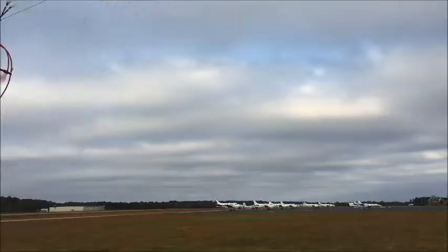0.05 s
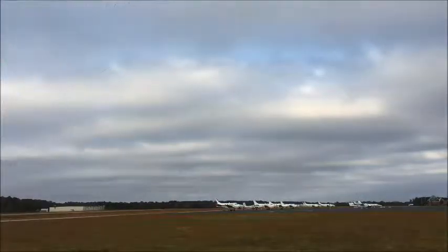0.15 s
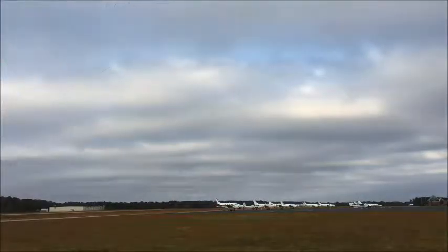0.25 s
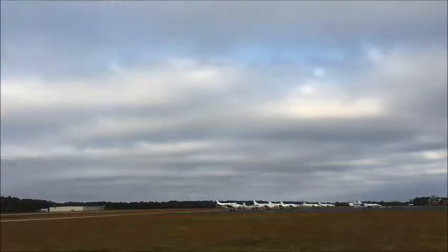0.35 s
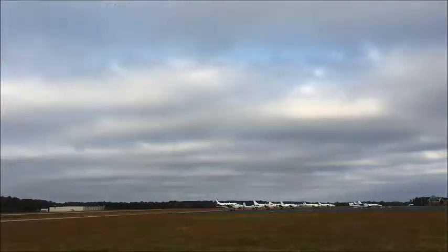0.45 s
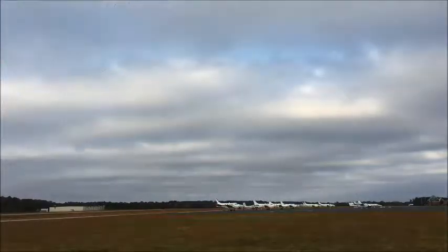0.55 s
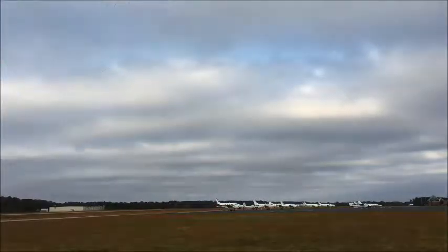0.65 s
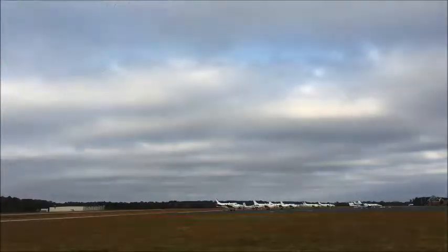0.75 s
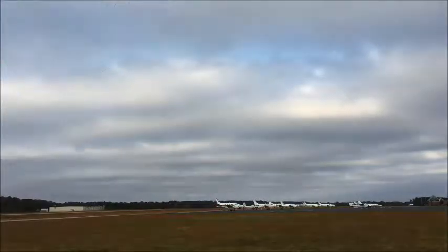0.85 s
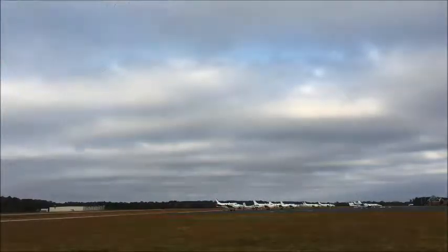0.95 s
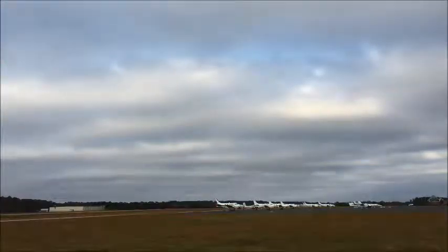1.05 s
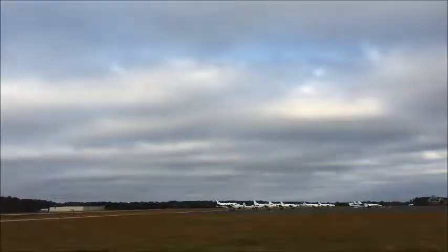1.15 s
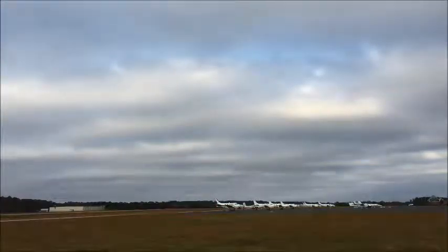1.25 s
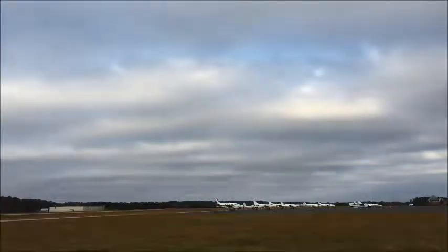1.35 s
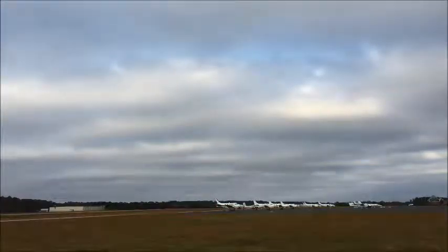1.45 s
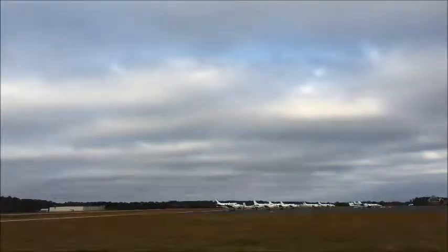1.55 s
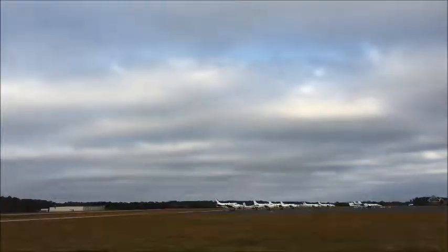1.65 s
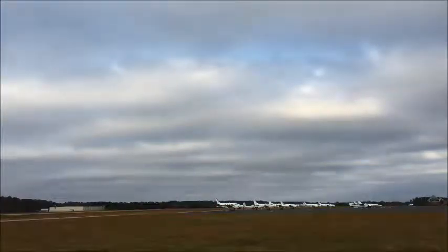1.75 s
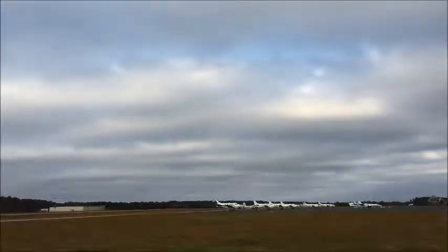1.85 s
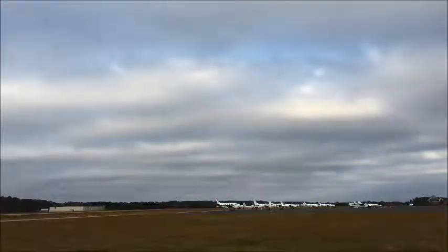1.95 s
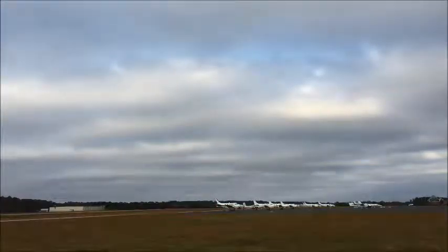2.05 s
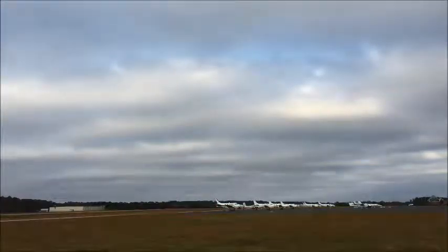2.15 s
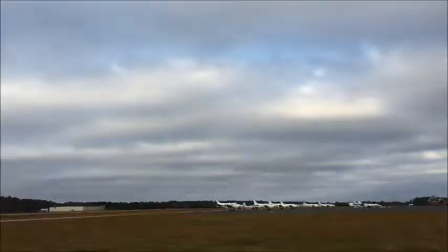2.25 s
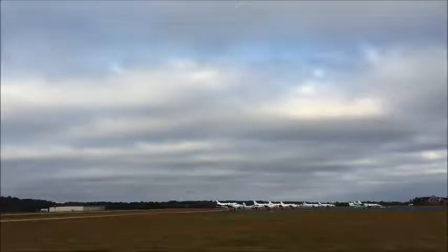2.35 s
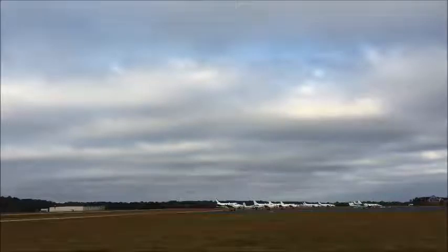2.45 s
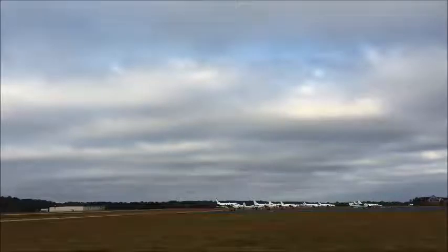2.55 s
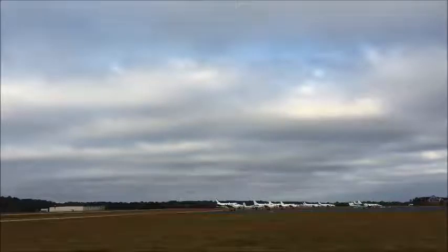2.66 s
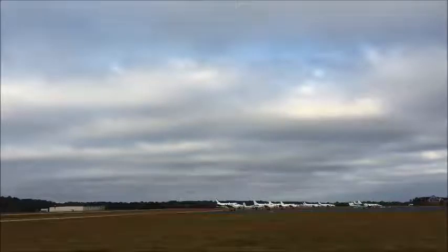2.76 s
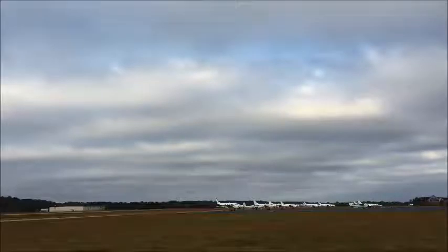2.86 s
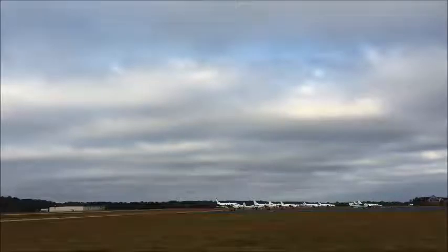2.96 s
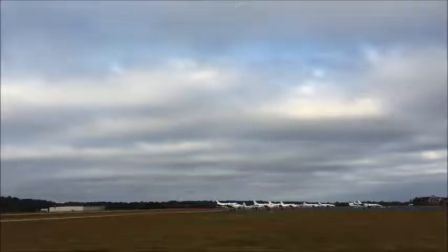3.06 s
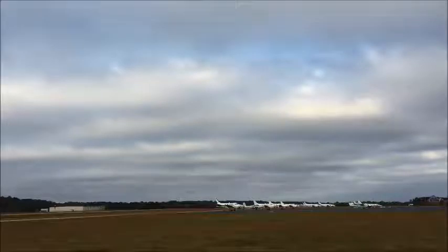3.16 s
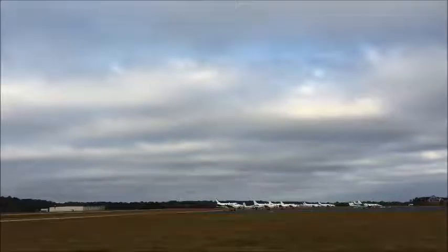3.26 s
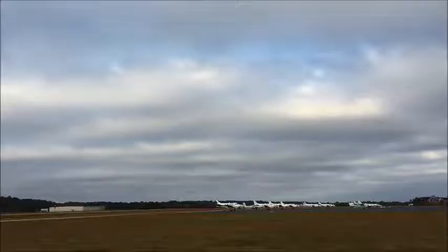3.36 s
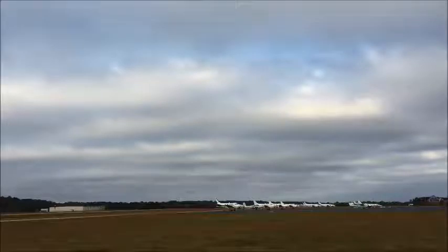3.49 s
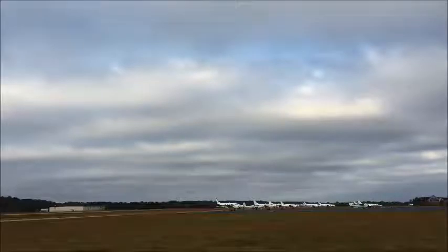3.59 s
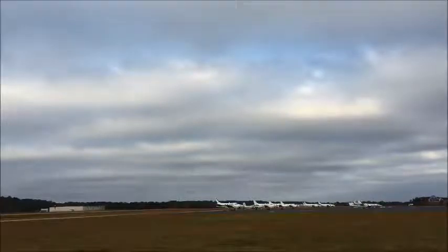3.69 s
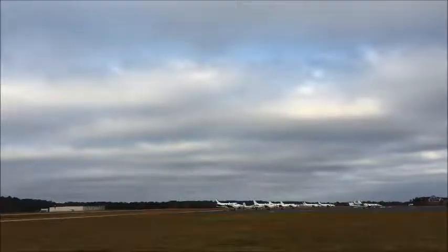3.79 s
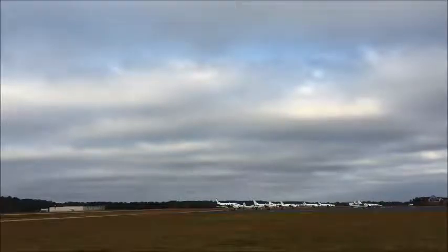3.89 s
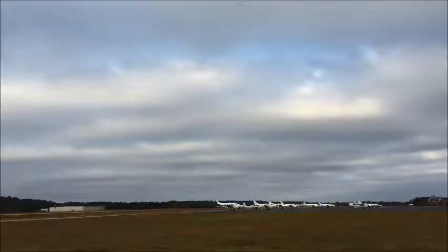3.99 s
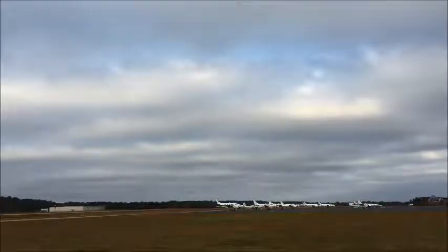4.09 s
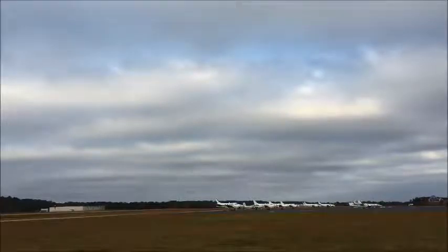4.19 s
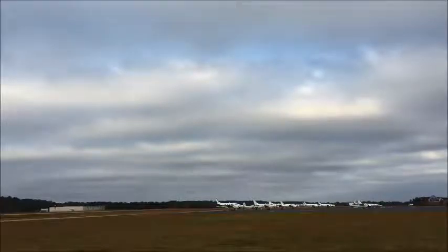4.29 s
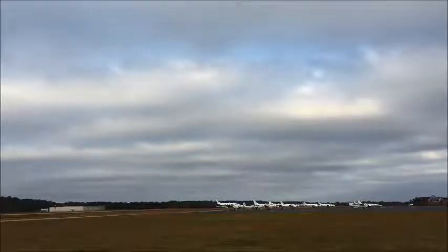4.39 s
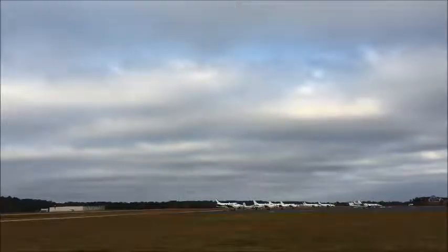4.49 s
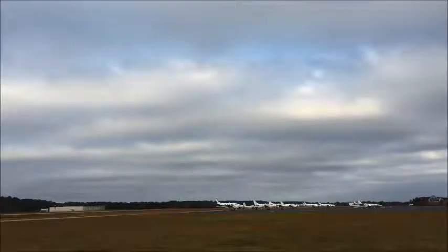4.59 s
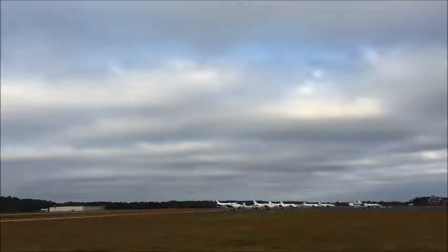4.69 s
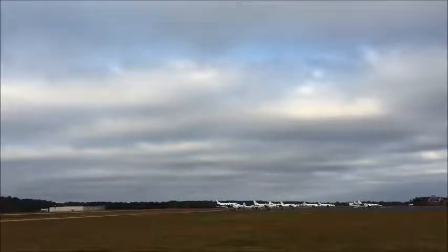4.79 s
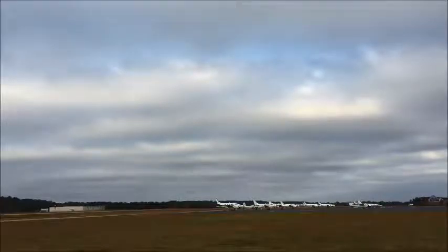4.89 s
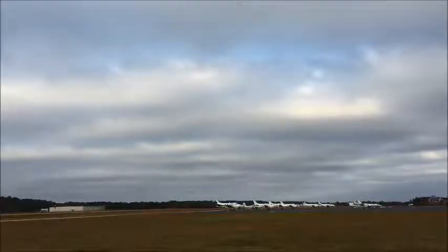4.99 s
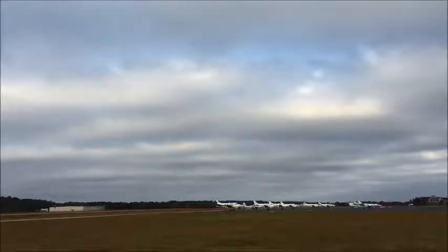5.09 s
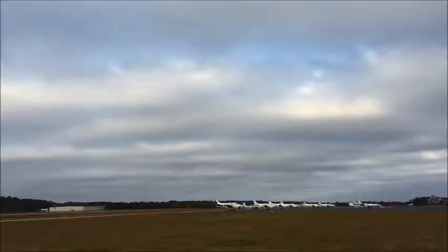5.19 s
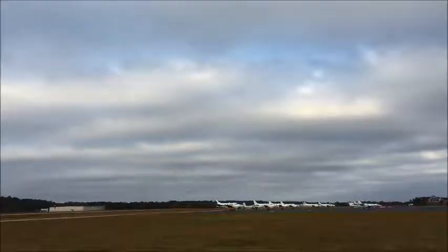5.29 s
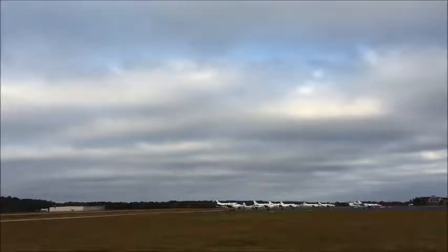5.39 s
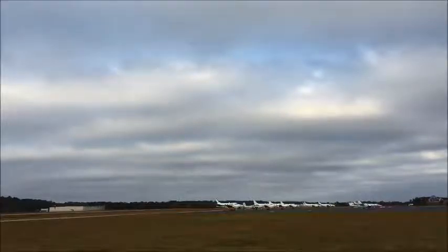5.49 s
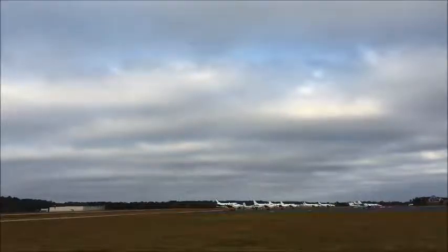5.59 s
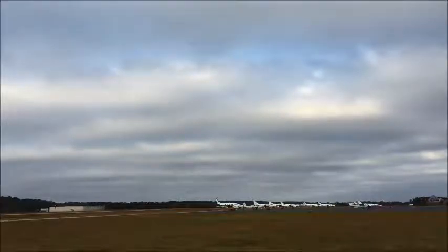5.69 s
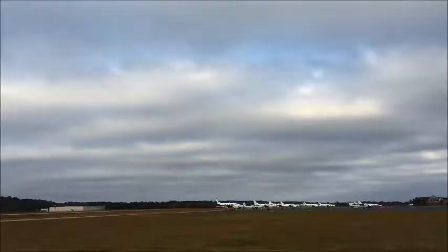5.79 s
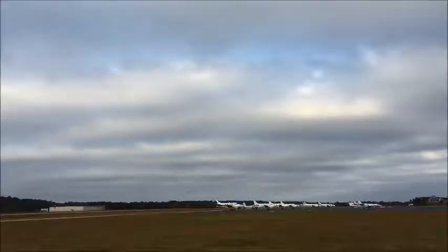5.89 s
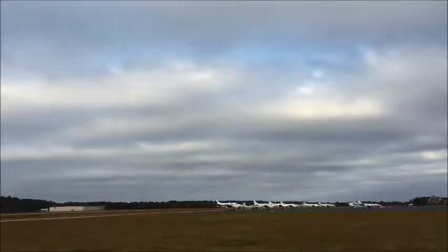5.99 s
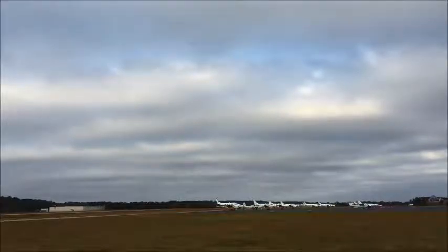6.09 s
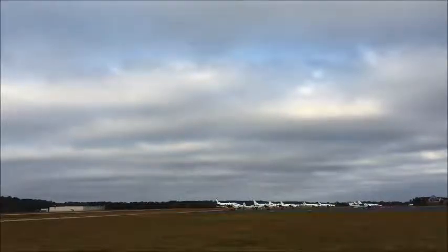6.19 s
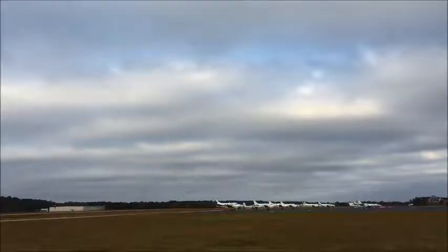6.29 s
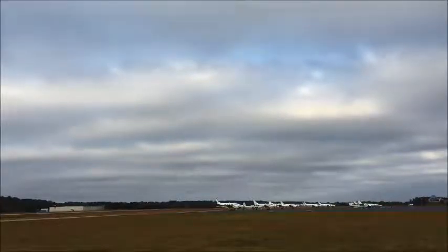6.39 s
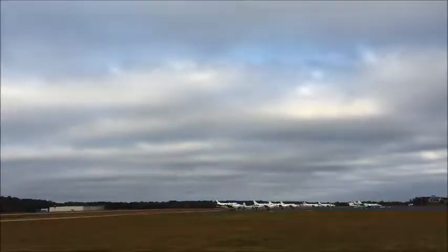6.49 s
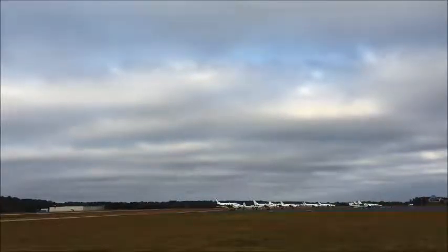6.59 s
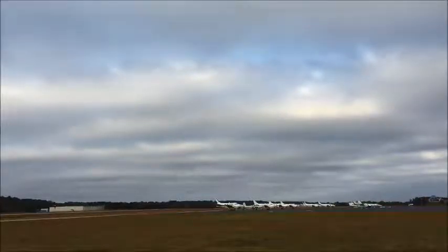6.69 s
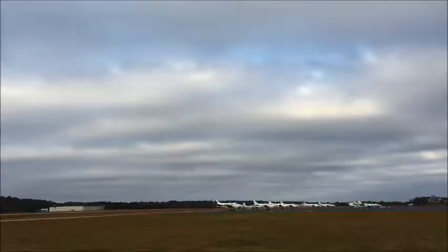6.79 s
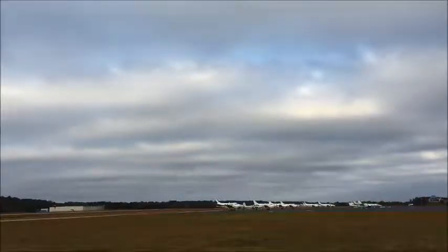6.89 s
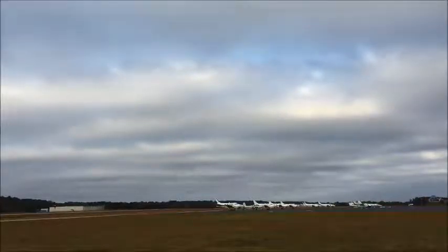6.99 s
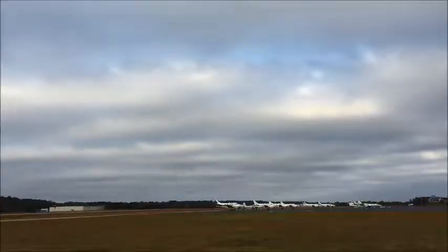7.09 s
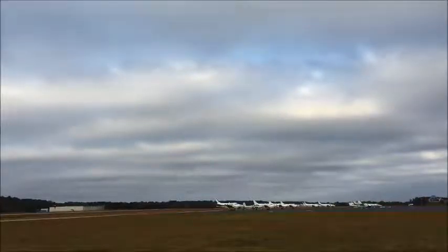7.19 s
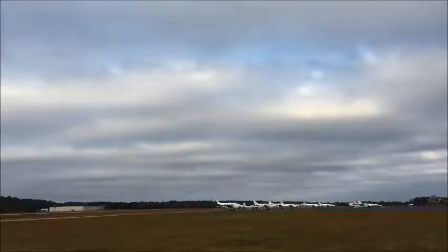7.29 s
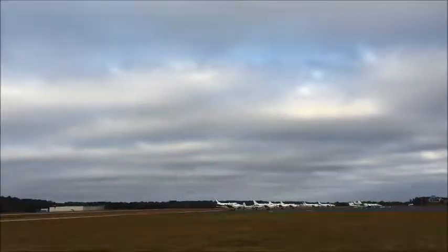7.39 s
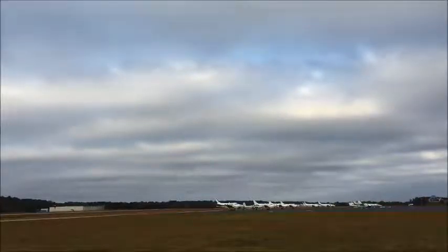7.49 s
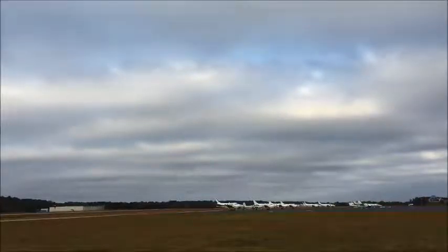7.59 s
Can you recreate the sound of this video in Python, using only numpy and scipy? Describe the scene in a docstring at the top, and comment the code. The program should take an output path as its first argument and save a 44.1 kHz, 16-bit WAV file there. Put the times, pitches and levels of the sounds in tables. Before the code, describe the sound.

A small powered parachute's uneven, sputtering engine buzz rushes close and loud within the first second, then fades duller as it climbs away over an airfield.

```python
"""An uneven engine buzz rushes closer: a powered parachute flies low past a microphone and climbs away.
A four-stroke twin fires unevenly and each of its two pipes spits a puff of gas every cycle.
A geared two-blade propeller drones and hisses. Hiss and puffs lose treble with distance.
The aircraft arrives twice, straight and off the grass. Light wind rumbles now and then over a faint hiss."""
import sys
import numpy as np
from scipy import signal
from scipy.fft import rfft, irfft, next_fast_len
from scipy.io import wavfile
from scipy.ndimage import uniform_filter1d, map_coordinates

SR = 44100
rng = np.random.default_rng(int(sys.argv[2]) if len(sys.argv) > 2 else 0)


def pcm_store(signal):
    """Save signal as 16-bit PCM."""
    levels = np.round(np.clip(np.atleast_2d(signal), -1, 1) * 32767)
    wavfile.write(sys.argv[1], SR, levels.astype(np.int16).T)


def boost(x):
    """Linear amplitude factor 10**(x/20) for a level x in decibels (scalar or array-like)."""
    u = np.asarray(x, float) / 20
    return 10 ** u


N = 337365
T = np.arange(N) / SR
HZ = np.fft.rfftfreq(next_fast_len(N), 1 / SR)

# flight path: time_s, distance_m
FLIGHT = [(0, 18.8), (.4, 13.3), (.8, 8.8), (1.2, 7.7), (1.6, 8.4), (2.4, 11.3), (2.9, 12.6), (3.6, 16.3),
          (4.4, 21.6), (5.8, 34.1), (6.5, 39.3), (7.65, 46.1)]
# which way the machine faces the listener: time_s, heading (-1 ahead, 0 side, 1 behind)
HEADING = [(0, -1.52), (.9, -0.028), (1.7, 0.23), (3.0, 0.7), (3.7, 0.91), (4.7, 0.89), (5.3, 0.62),
           (7.65, 0.79)]
# exhaust harmonics before the second push: multiple of the engine cycle, ahead_db, side_db, behind_db
EXHAUST_TONES = [(2, -2.5, -7.5, -8), (3, -10.5, -11.5, -3), (4, 1, -6, -5.5), (5, -3, -13, -5.5),
                 (6, -25, -14, -5), (7, 0.5, -4, -9), (8, -35, -21, -21), (9, -14, -53, -17),
                 (10, -8.5, -16.5, -26.5), (11, -26, -26, -21), (12, 1.5, -2, -34), (13, -16.5, -31, -39),
                 (14, -19.5, -46, -24), (15, -8.5, -19, -32), (22, -14, -22.5, -51)]
# propeller harmonics: multiple of the blade passage, ahead_db, side_db, behind_db
BLADE_TONES = [(1, -23, 5.5, -24), (2, -8, -6, -20), (3, -9, -28, 0.5), (4, -29, -40, -7.5),
               (5, -10, -28, -19), (6, -10.5, -41.5, -5.5), (7, -13.5, -17, -20.5), (8, -26, -45, -24),
               (9, -15, -13, -29), (10, -24, -20, -52), (11, -16, -23, -46), (12, -11, -15, -58),
               (13, -9.5, -55, -44)]
# relative colour of the blade hiss: pitch_hz, level_db (per Hz)
HISS_COLOUR = [(40, 4.5), (100, 1.5), (200, 1), (400, -7), (1000, -4), (1500, -7), (2500, -7.5),
               (4000, -15.5), (8000, -8.5), (16000, -13)]
# relative colour of the gas puffs: pitch_hz, level_db (per Hz)
PUFF_COLOUR = [(500, -4), (1200, -4), (2000, 3), (3200, 0), (4400, 1.5), (6000, 4.5), (9000, 11.5),
               (12000, 5.5), (16000, 1)]
# pipe ends singing in the jet: pitch_hz, width_hz, average level_db
PIPE_RINGS = [(4354, 93, -4), (5300, 130, -13)]
# pitch range of the valve knock: low_hz, high_hz
KNOCK_RANGE = [450, 1500]
# valve knock at 10 m: ahead_db, side_db, behind_db
KNOCK_DB = [-34, -35, -46]
# headings for the five-step levels: ahead, side, just past, rear quarter, behind
SEEN_FROM = [-1, 0, .3, .65, 1]
# levels at 10 m, one level_db for each of those headings; FADE also moves the hiss and the puffs
EXHAUST_DB = [-18, -16.5, -17.5, -18, -22]
BLADE_DB = [-18, -28, -24, -23, -21]
HISS_DB = [-16, -19, -21, -22, -22]
NEAR_PUFF_DB = [-11.5, -16.5, -23, -22.5, -36.5]
# the far pipe is hidden behind the engine until it has passed
FAR_PUFF_DB = [-45, -44, -24, -23, -19]
# hiss and puffs sink and waver on the way out, more than the tones: time_s, hiss_db, puffs_db
FADE = [(0, 0.5, 0.5), (4.5, 1.5, 0), (5.6, -1.5, -0.5), (6.1, -2, 0.5), (6.7, -5, 1.5), (7.2, -5.5, 0.5),
        (7.35, -8.5, -2.5), (7.65, -9.5, -10)]
# grass bounce at a grazing angle: pitch_hz, gain_db
GRASS = [(50, -.5), (500, -.6), (1300, -2), (2200, -10), (4000, -18), (10000, -24)]
# extra loss as the bounce gets steeper: below and above the split, db_per_ms of lag
STEEP_DB_PER_MS = [.9, 3.0]
# puffs of wind on the microphone, before they waver: peak_s, level_db, length_s
GUSTS = [(3.9, -41, .2), (4.45, -40, 0.079), (5.6, -39, .2), (6.493, -42, 0.24)]
# relative colour of the faint steady hiss: pitch_hz, level_db (per Hz)
FIELD_COLOUR = [(100, -11), (1000, -17), (5000, 0), (11000, -3), (16000, -33)]
# dips from the microphone housing: pitch_hz, width_hz, gain_db
MIC_DIPS = [(4980, 230, -3.5), (7390, 1260, -3), (9720, 3480, -10.5)]

CYCLE_HZ = 28.6  # engine cycles at the source, each two crank turns
BLADE_RATIO = 1.768  # blade passages per engine cycle
SECOND_FIRING, SECOND_SHARE = .375, .7  # second push: part of a cycle later, strength beside the first
AIR_DB_PER_M, AIR_POWER = .26, 1.6  # loss at 10 kHz and its rise with frequency
AHEAD_TREBLE_DB = 1.36  # per octave above 2 kHz, at heading -1
MIC_M = 1.5  # microphone height
CRUISE_M, CLIMB_FROM_S, CLIMB_M_PER_S, TOP_M = 4.25, 3.2, .82, 6.3  # level, a gentle climb, level again


def unit(x):
    """Scale to rms 1."""
    return x / np.sqrt(np.mean(x ** 2))


def on_log(hz, table):
    """Read a pitch and level table along a logarithmic pitch scale."""
    f, db = np.transpose(table)
    return np.interp(np.log(np.maximum(hz, 1)), np.log(f), db)


def shape(x, db, turn=0):
    """Filter by a gain in dB for every frequency of HZ, turned by some radians."""
    size = next_fast_len(N)
    spectrum = rfft(x, size) * boost(db) * np.exp(1j * turn)
    return irfft(spectrum, size)[:N]


def walk(rate):
    """Random levels held 1 / rate s and smoothed twice; spread near 1."""
    hold = int(SR / rate)
    steps = np.repeat(rng.standard_normal(N // hold + 1), hold)
    return 1.3 * uniform_filter1d(uniform_filter1d(steps, hold), hold)[:N]


def field_hiss():
    """The faint steady hiss of the field: coloured noise."""
    return boost(-50) * unit(shape(rng.standard_normal(N), on_log(HZ, FIELD_COLOUR)))


def wind():
    """Soft low buffets over a faint breeze: deep noise whose strength swells and wavers."""
    low_band = signal.butter(2, [60, 170], "band", fs=SR, output="sos")
    rumble = unit(signal.sosfilt(low_band, rng.standard_normal(N)))
    gusts = sum(boost(db) * np.exp(-((T - s) / length) ** 2) for s, db, length in GUSTS)
    breeze = boost(-46)
    return rumble * (breeze + gusts) * boost(0.83 * walk(2.4))


def bands(colour, far_m, heading):
    """Half-octave noise bands of a colour, brighter from ahead, each dulled by the air over the distance."""
    white = rfft(rng.standard_normal(next_fast_len(N))) * boost(on_log(HZ, colour))
    white = white / np.sqrt(np.mean(irfft(white) ** 2))
    octave = np.log2(np.maximum(HZ, 1))
    for centre in np.arange(5.5, 14.5, .5):  # in octaves above 1 Hz
        window = np.cos(np.pi * np.clip(octave - centre, -.5, .5)) ** 2
        loss_db = AIR_DB_PER_M * (2 ** centre / 10000) ** AIR_POWER * far_m
        octaves_up = max(centre - np.log2(2000), 0)
        aim_db = AHEAD_TREBLE_DB * octaves_up * np.maximum(-heading, 0)
        yield irfft(white * window)[:N] * boost(aim_db - loss_db)


def blade_hiss(passages, far_m, heading, throb, swell_db, flicker_db):
    """Air torn at the blades: noise that throbs once and twice per blade passage."""
    swell = swell_db * walk(2.45)
    out = sum(band * boost(swell + flicker_db * walk(24)) for band in bands(HISS_COLOUR, far_m, heading))
    throbbing = 1 + throb * np.cos(4 * np.pi * passages) + 0.26 * np.cos(2 * np.pi * passages)
    return out * throbbing


def valve_knocks(turns, scatter_db, shake_ms):
    """A dull knock as an exhaust valve opens, a little early or late each time."""
    at = np.flatnonzero(np.diff(np.floor(turns)) > 0)
    chance = rng.standard_normal((len(at), 2))
    shift = (shake_ms * chance[:, 0] * SR / 1000).astype(int)
    clicks = np.zeros(N)
    clicks[np.clip(at + shift, 0, N - 1)] = boost(scatter_db * chance[:, 1])
    knock_band = signal.butter(3, KNOCK_RANGE, "band", fs=SR, output="sos")
    return unit(signal.sosfilt(knock_band, -clicks))


def puffs(turns, far_m, heading, rise, fall, scatter_db, colour_db, grain_db, sing_db):
    """One burst of gas a cycle: quick rise, slower fall; each has its own size and colour."""
    count = (turns - np.floor(turns.min())).astype(int)  # which puff each sample belongs to
    part = turns % 1
    blurred_rise = rise * (1 + far_m / 30)  # eddies blur far ones
    gate = unit((1 - np.exp(-part / blurred_rise)) ** 2 * np.exp(-part / fall))
    size_db = scatter_db * rng.standard_normal(count.max() + 1)
    out = 0
    for band in bands(PUFF_COLOUR, far_m, heading):
        # heard from behind, through the propeller's wake, the colour scatters more
        own_db = colour_db * rng.standard_normal(len(size_db))[count] * (1.3 + .6 * heading)
        out = out + band * boost(size_db[count] + own_db)
    for hz, width, db in PIPE_RINGS:
        ring = signal.lfilter(*signal.iirpeak(hz, hz / width, fs=SR), out)
        ring_gain = boost(db + sing_db * rng.standard_normal(len(size_db)))[count]
        out = out + ring * ring_gain * (1 + heading)
    return gate * out * boost(grain_db * walk(400))


def tones(turns, orders, heading, second, waver_db, rate):
    """Harmonics of a rotation, with a second push in each turn; higher ones waver more in strength."""
    out = 0
    for k, *aimed_db in orders:
        db = np.interp(heading, [-1, 0, 1], aimed_db) + waver_db * np.sqrt(k) * walk(rate)
        pair = 1 + second * np.exp(-2j * np.pi * k * SECOND_FIRING)
        out = out + boost(db) * np.imag(pair * np.exp(2j * np.pi * k * turns))
    return out


def aircraft(far_m):
    """Engine and propeller as they reach the listener: late by the travel time, weaker as 1 / distance."""
    heading = np.interp(T, *np.transpose(HEADING))

    def aimed(db):
        """Gain for the present heading."""
        return boost(np.interp(heading, SEEN_FROM, db))

    turns = CYCLE_HZ * (T - far_m / 343)  # engine cycles; sound travels 343 m/s
    passages = BLADE_RATIO * turns
    exhaust = tones(turns - .135, EXHAUST_TONES, heading, SECOND_SHARE, waver_db=.15, rate=12)
    blades = tones(passages - .3, BLADE_TONES, heading, 0, waver_db=1.33, rate=7.1)
    # blades sweeping through the exhaust jet throb once a crank turn
    blades = blades * (1 + 0.22 * np.cos(4 * np.pi * turns))
    # rise and fall are parts of a cycle
    near = puffs(turns + .02, far_m, heading, rise=.02, fall=.16,
                 scatter_db=.8, colour_db=1.4, grain_db=1.5, sing_db=4)
    far = puffs(turns - .385, far_m, heading, rise=.03, fall=.19,
                scatter_db=1.1, colour_db=1.4, grain_db=2, sing_db=4)
    knocks = valve_knocks(turns + 0.0333, scatter_db=3.5, shake_ms=0.16)
    knocks = knocks + valve_knocks(turns - .36, scatter_db=6.5, shake_ms=0.12)
    hiss = blade_hiss(passages, far_m, heading, throb=0.3, swell_db=0.6, flicker_db=0.64)

    s, hiss_fade_db, puff_fade_db = np.transpose(FADE)
    whole = aimed(EXHAUST_DB) * exhaust + aimed(BLADE_DB) * blades
    whole = whole + boost(np.interp(T, s, hiss_fade_db)) * aimed(HISS_DB) * hiss
    both_pipes = aimed(NEAR_PUFF_DB) * near + aimed(FAR_PUFF_DB) * far
    whole = whole + boost(np.interp(T, s, puff_fade_db)) * both_pipes
    whole = whole + boost(np.interp(heading, [-1, 0, 1], KNOCK_DB)) * knocks
    return whole * 10 / far_m


def grass_bounce(direct, far_m):
    """Echo off soft grass: the steeper the bounce, the longer its lag and the more the grass swallows."""
    height_m = np.clip(CRUISE_M + CLIMB_M_PER_S * (T - CLIMB_FROM_S), CRUISE_M, TOP_M)
    # the bounce seems to come from a mirror image under the ground
    lag_ms = (np.sqrt(far_m ** 2 + 4 * MIC_M * height_m) - far_m) / .343
    # eddies near the ground make the bounce path shiver
    late = np.arange(N) - (lag_ms + 0.03 * walk(7.5)) * SR / 1000
    off_grass = shape(direct, on_log(HZ, GRASS), turn=0.042)  # soft ground turns the wave a little
    bounce = map_coordinates(off_grass, [late], order=3, mode="mirror")
    deep = shape(bounce, -10 * np.log10(1 + (HZ / 550) ** 4))  # split at 550 Hz
    deep_gain, high_gain = (boost(-db * (lag_ms - 0.5)) for db in STEEP_DB_PER_MS)
    return deep_gain * deep + high_gain * (bounce - deep)


def scene():
    """The aircraft, its bounce off the grass, wind and the faint hiss of the field."""
    path_m = np.interp(T, *np.transpose(FLIGHT))
    far_m = uniform_filter1d(path_m, SR // 4, mode="nearest")
    direct = aircraft(far_m)
    return (field_hiss() + wind() + grass_bounce(direct, far_m) + direct)[None]


def roll_off(x):
    """The treble ends steeply here."""
    return signal.sosfilt(signal.butter(12, 17020, fs=SR, output="sos"), x)


def record(dry):
    """A small microphone: no deep bass, no top, dips from its housing."""
    dips_db = sum(db * np.exp(-((HZ - hz) / width) ** 2) for hz, width, db in MIC_DIPS)
    top_db = -np.clip((HZ - 15900) / 12, 0, 60)  # falls 1 dB every 12 Hz above 15.9 kHz, down to -60
    bass_cut = signal.butter(6, 50.3, "high", fs=SR, output="sos")
    mix = signal.sosfilt(bass_cut, shape(dry[0], dips_db + top_db))
    return roll_off(mix[None])


dry = scene()
out = record(dry)
pcm_store(out)
```